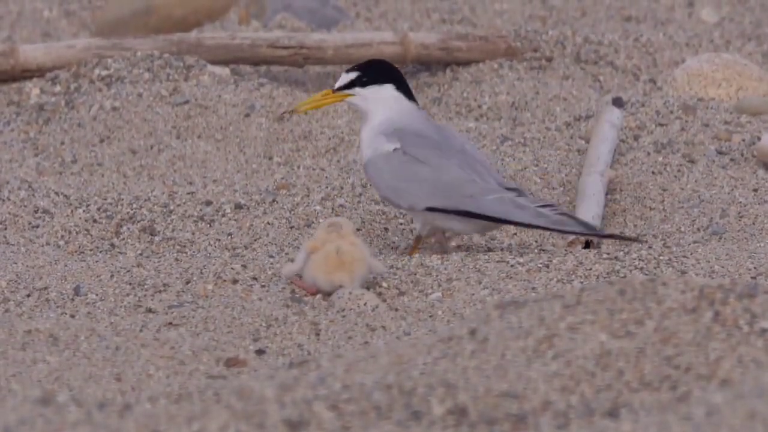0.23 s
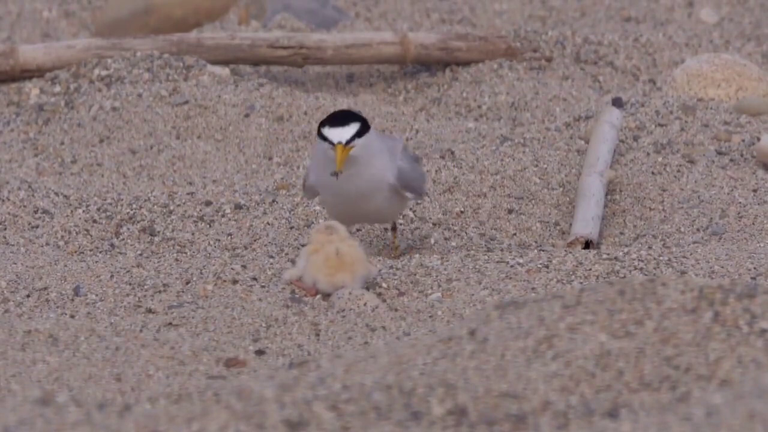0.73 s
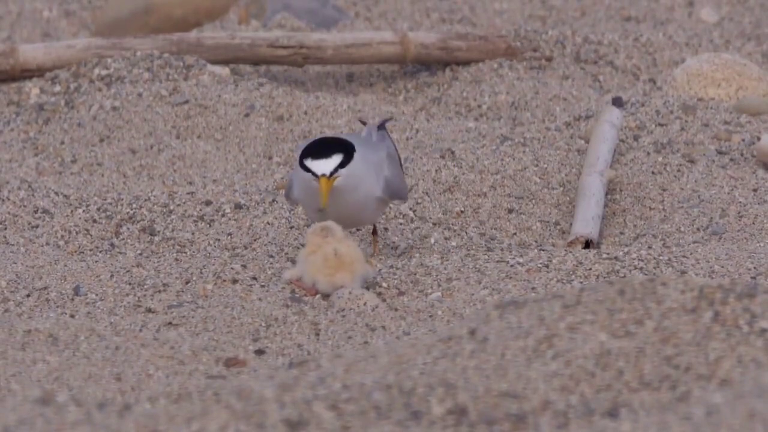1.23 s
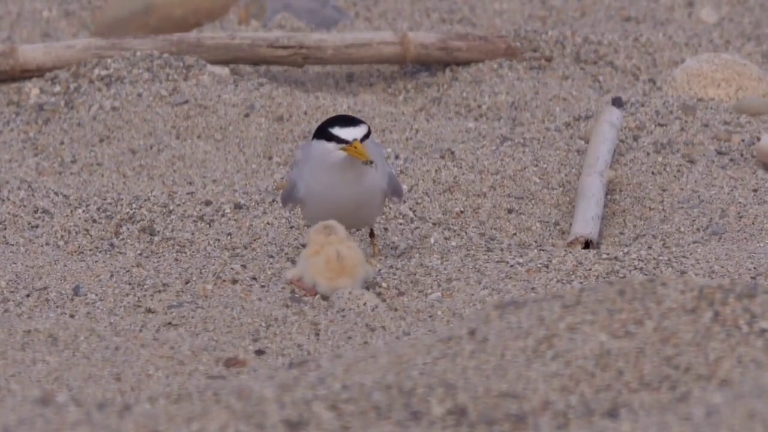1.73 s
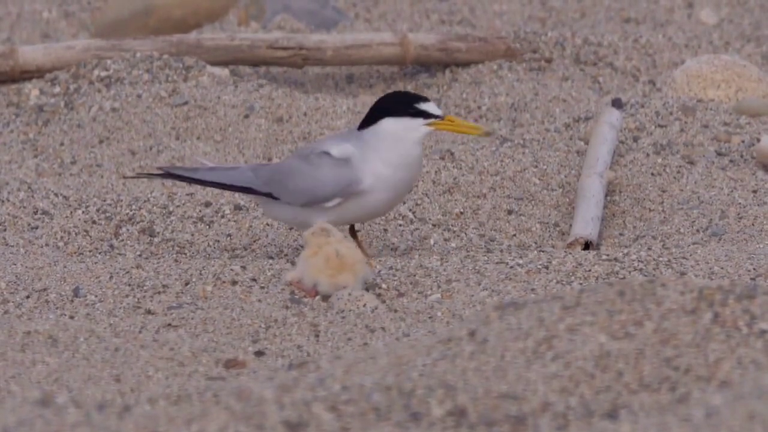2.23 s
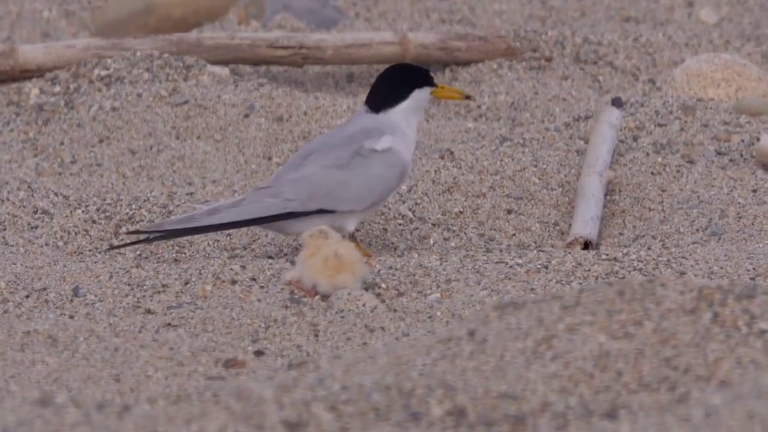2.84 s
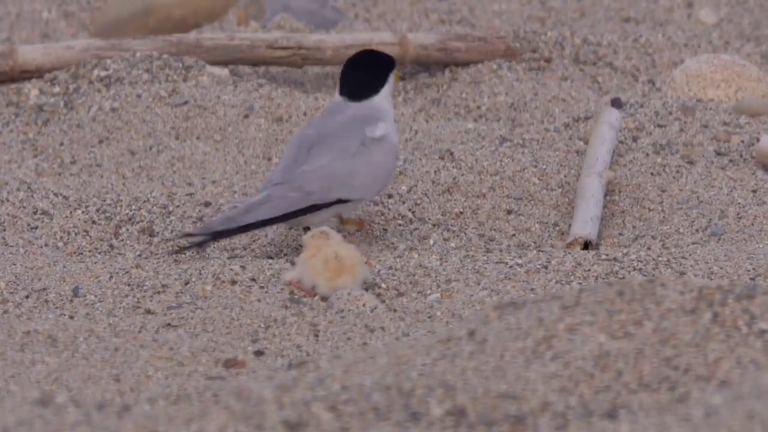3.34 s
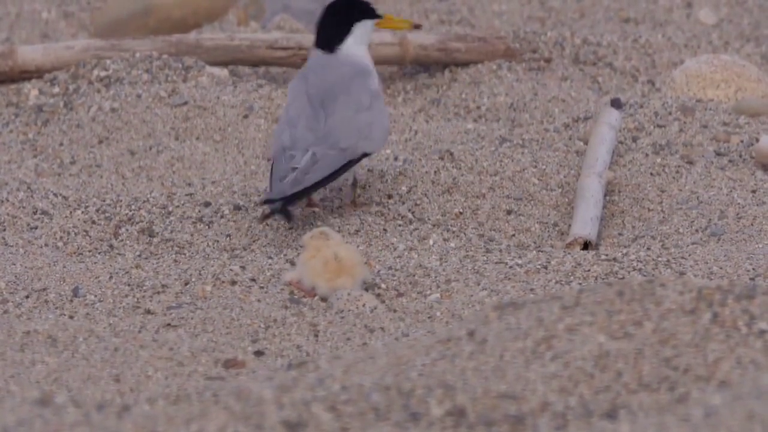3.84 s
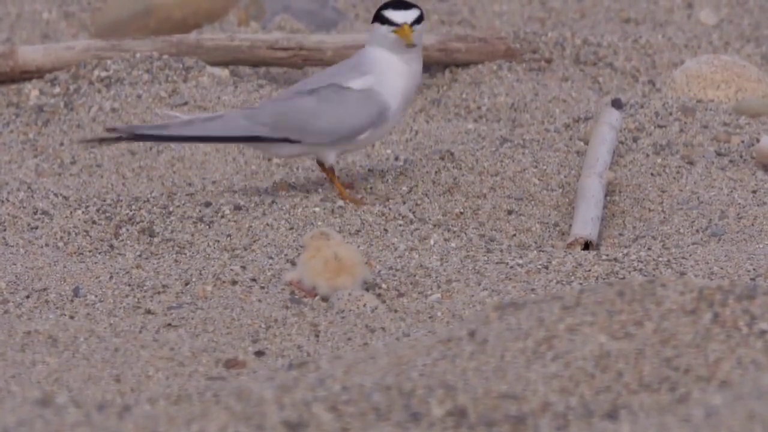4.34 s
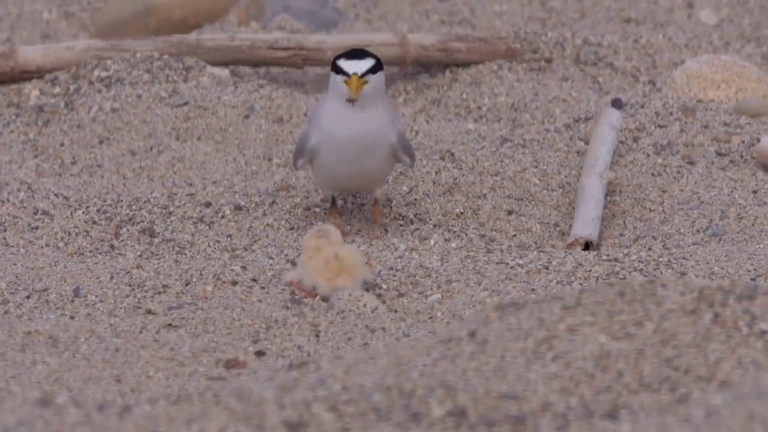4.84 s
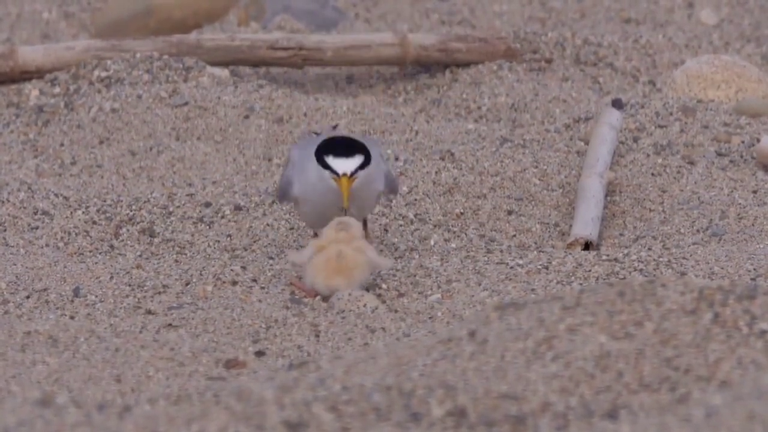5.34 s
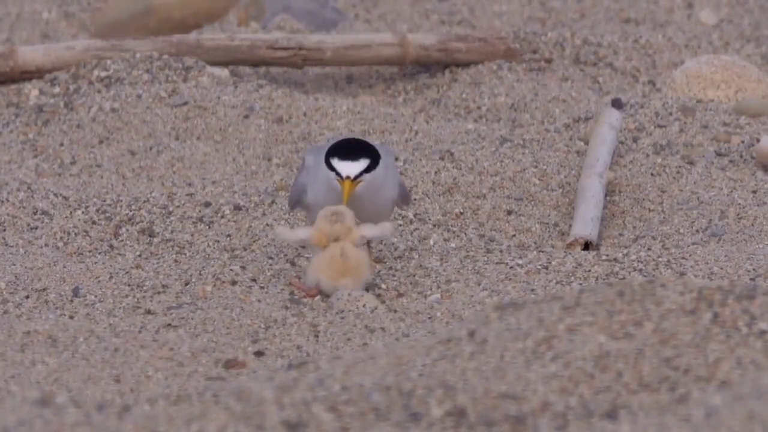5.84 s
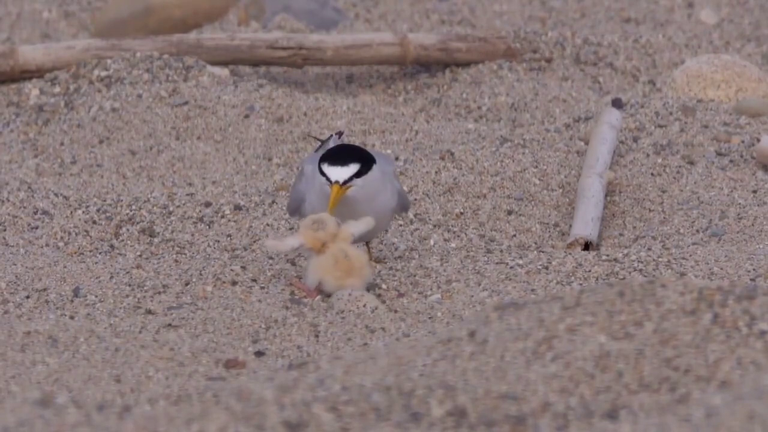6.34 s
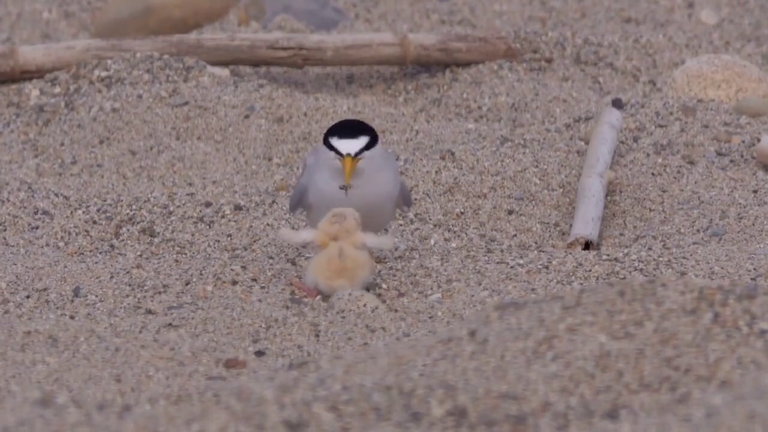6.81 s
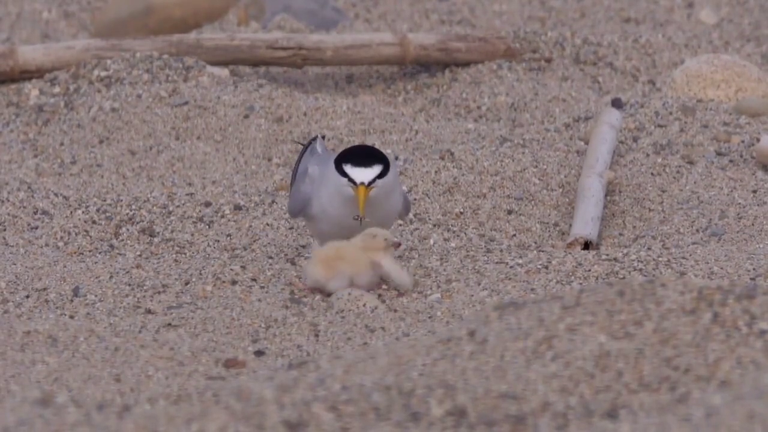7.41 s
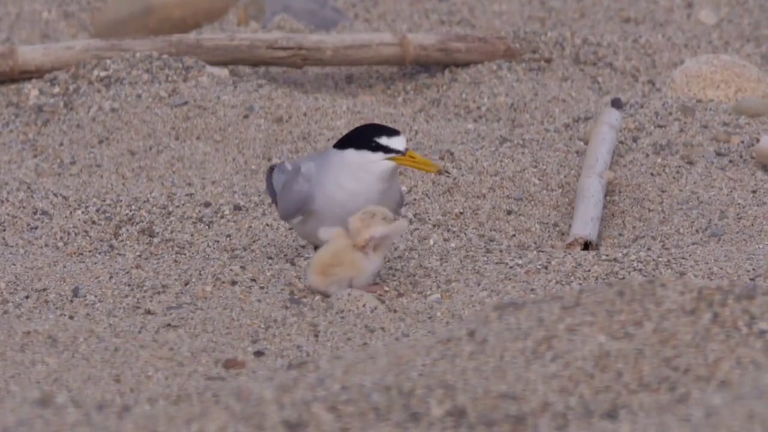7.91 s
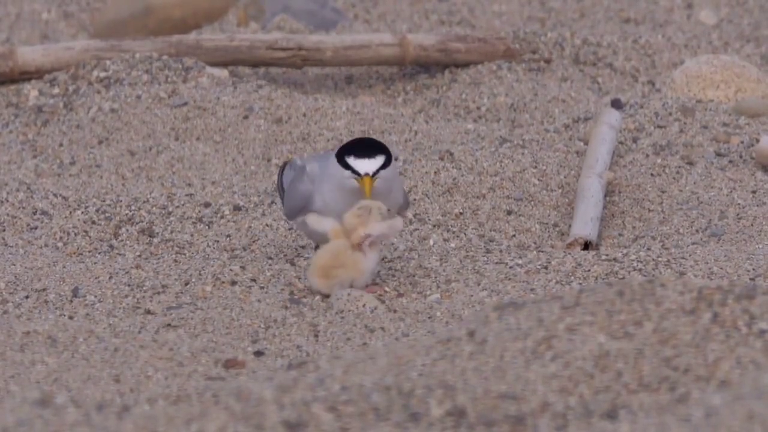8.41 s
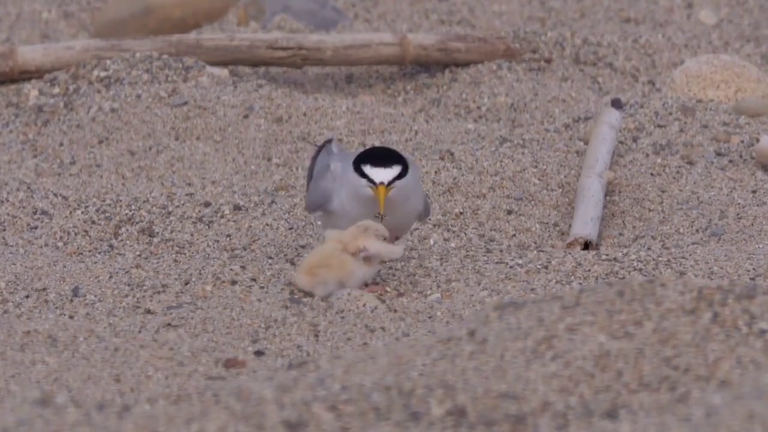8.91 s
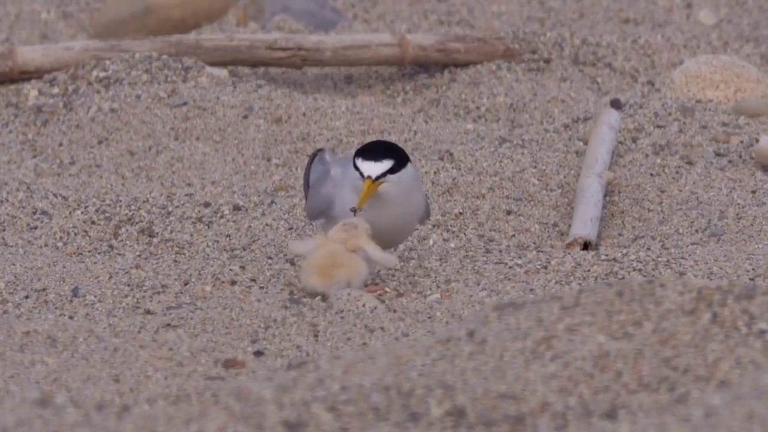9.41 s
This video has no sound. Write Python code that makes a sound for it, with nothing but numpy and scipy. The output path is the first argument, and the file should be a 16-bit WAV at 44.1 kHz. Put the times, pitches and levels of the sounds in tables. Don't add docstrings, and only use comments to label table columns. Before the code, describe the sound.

On an open beach, seabirds rasp and chirp in short bursts, ending in a near row of loud chirps over soft surf and hiss.

```python
import sys
import numpy as np
from scipy import signal
from scipy.fft import rfft, irfft
from scipy.io import wavfile
from scipy.ndimage import uniform_filter1d

SR = 44100
rng = np.random.default_rng(int(sys.argv[2]) if len(sys.argv) > 2 else 0)


def persist_wave(psi):
    counts = np.round(np.clip(psi, -1, 1) * 32767).astype(np.int16)
    wavfile.write(sys.argv[1], SR, np.atleast_2d(counts).T)


def invert_db(x):
    u = np.asarray(x, float) / 20
    return 10 ** u


N = 426006

# pitch_hz, level_db
THROAT_COLOUR = [(600, -42), (1100, -1), (1700, -9), (2600, -3), (3700, -1), (5100, -2), (6300, -4.5),
                 (7800, -6.5), (9500, -24.5), (13000, -59)]


def read(points, hz):
    f, value = np.transpose(points)
    return np.interp(np.log(hz + 1), np.log(f + 1), value)


def wander(count, smooth):
    x = uniform_filter1d(rng.standard_normal(count + 400), int(smooth))[200:-200]
    return x * np.sqrt(int(smooth))


def add(mix, start_s, sound):
    part = mix[:, round(start_s * SR):][:, :sound.shape[1]]
    part += sound[:, :part.shape[1]]


def clock(length_s):
    return np.arange(round(length_s * SR)) / SR


def fade(t, rise_s, fall_s):
    return np.clip(np.minimum(t / rise_s, (t[-1] - t) / fall_s), 0, 1)


def steady(lines_db, t):
    return invert_db(np.array(lines_db))[:, None] + 0 * t


def channels(angle_deg):
    angle = np.radians(angle_deg)
    return np.array([[np.cos(angle)], [np.sin(angle)]])


def surf():
    # pitch_hz, level_db (per Hz)
    colour = [(180, -91), (300, -2), (580, -26), (781, -12), (984, 1), (1560, -3), (1870, -4.5),
              (2440, -5.5), (3070, -7.5), (4720, -12), (5290, -11.5), (5840, -14), (9120, -15.5),
              (9910, -18.5), (15500, -17)]
    # pitch_hz, side_minus_mid_db
    width = [(60, -1), (110, 0), (200, 3), (380, -17), (700, -2.5), (1290, 2.5), (2380, 6.5), (4400, 3.5),
             (8120, -1), (15000, -1)]
    # time_s, level_db
    swell = [(0.0, -45.5), (2.7, -47), (4.57, -47), (4.85, -47), (6.27, -48), (6.75, -45), (7.5, -46),
             (8.0, -42), (8.4, -50.5), (9.66, -46.5)]
    frames, hz = N // 256 + 5, np.fft.rfftfreq(1024, 1 / SR)
    a, b, c, d, patches = rng.standard_normal((frames, 513, 5)).T
    patches = uniform_filter1d(uniform_filter1d(patches, 12, 0), 16, 1) * np.sqrt(12 * 16)
    time_s, swell_db = np.transpose(swell)
    swell_db = np.interp(np.arange(frames) * 256 / SR, time_s, swell_db - np.median(swell_db))
    share = 1 / (1 + (hz[:, None] / 5500) ** 3)
    mid_db = read(colour, hz)[:, None] + share * (swell_db + 1.7 * patches)
    side_db = (read(colour, hz) + read(width, hz))[:, None] + share * (swell_db + 0.83 * patches)
    spectra = np.array([(a + 1j * b) * invert_db(mid_db), (c + 1j * d) * invert_db(side_db)])
    mid, side = signal.istft(spectra, nperseg=1024, noverlap=768)[1][:, :N]
    return invert_db(-40) * np.array([mid + side, mid - side]) / np.std(mid)


def scatter(x):
    t = clock(.06)
    tail = rng.standard_normal((2, len(t))) * invert_db(-60 * t / 0.078) * (t > .001)
    return signal.fftconvolve(x, tail / np.linalg.norm(tail[0]), axes=1)[:, :N]


def tick(mix, start_s, level_db, angle_deg):
    t = clock(0.013)
    snap = uniform_filter1d(rng.standard_normal(len(t)) * np.exp(-t / .0005), size=4)
    ring = np.sin(2 * np.pi * 1250 * t) * np.exp(-t / .004)
    add(mix, start_s, invert_db(level_db) * (1.3 * snap + .45 * ring) * channels(angle_deg))


def sand(mix):
    # start_s, peak_db, side (1 ahead, -1 behind)
    ticks = [
        (1.165, -31, -1),
        (1.236, -28, -1),
        (2.605, -15, 1),
        (5.354, -22, 1),
        (7.346, -19, 1),
    ]
    for start_s, level_db, side in ticks:
        tick(mix, start_s, level_db, side * 33)


def voice(hz, strengths, level, level_db, bearing, rough=0.04, jitter=0.017):
    hz = hz * (1 + jitter * wander(count=len(hz), smooth=43))
    k = np.arange(1, len(strengths) + 1)[:, None]
    air_db = 0.57 * min(level_db + 12.5, 0) * np.maximum(k * hz - 5500, 0) / 1000
    gains = strengths * invert_db(read(THROAT_COLOUR, k * hz) + air_db)
    turns = k * np.cumsum(hz) / SR + rng.random(k.shape) * 0.12 + 0.403
    angle_deg, lag_us = bearing
    turns = turns + .02 * rng.standard_normal((2, len(k), 1))
    late = np.array([lag_us / 810000.0, 0])[:, None, None]
    tone = (gains * np.cos(2 * np.pi * (turns - k * hz * late))).sum(1)
    tone /= np.sqrt(np.percentile((gains ** 2).sum(0), 60) / 2)
    shared, left, right = (wander(count=len(hz), smooth=16) for _ in range(3))
    flutter = 1 + rough * (shared + 1.02 * np.array([left, right]))
    return invert_db(level_db) * level * flutter * tone * channels(angle_deg)


def peep(mix, start_s, level_db, length_s, first_hz, last_hz, bearing):
    t = clock(length_s)
    hz = first_hz + (last_hz - first_hz) * t / length_s + 60 * np.sin(np.pi * t / length_s)
    overtone_db = np.interp(hz, [3150, 3550], [-8, -24])
    strengths = invert_db(np.array([0 * t, overtone_db, overtone_db - 16]))
    level = fade(t, 0.0023, .004) * (1.1 - 0.26 * t / length_s)
    add(mix, start_s, voice(hz, strengths, level, level_db + 1, bearing, rough=.07, jitter=0.0044))


def puff(mix, start_s, level_db, width_s, bearing):
    t = clock(6 * width_s)
    air = rfft(rng.standard_normal((2, len(t))))
    colour = np.sqrt(invert_db(read(THROAT_COLOUR, np.fft.rfftfreq(len(t), 1 / SR))))
    air = irfft(air * colour, len(t))
    swell = np.exp(-.5 * (t / width_s - 3) ** 2)
    ears = abs(channels(bearing[0]))
    add(mix, start_s - 3 * width_s, invert_db(level_db) * ears * air / np.std(air) * swell)


def slide(mix, start_s, level_db, length_s, first_hz, last_hz, bearing):
    t = clock(length_s)
    low_rise = first_hz < 1500
    strengths = steady([-14, -8, 0, -2, -20] if low_rise else [-8, 0, -12, -20, -30], t)
    rough = .4 if last_hz < first_hz else .1
    hz = np.linspace(first_hz, last_hz, len(t))
    level = fade(t, 0.17 * length_s, 0.36 * length_s)
    add(mix, start_s, voice(hz, strengths, level, level_db, bearing, rough=rough))


def note(mix, start_s, level_db, length_s, hz, overtone_db, bearing):
    t = clock(length_s + 0.019)
    bend = np.interp(t, [0, 0.29 * length_s, 0.76 * length_s, length_s, length_s + 0.00342, t[-1]],
                     [.985, .997, 1.003, .97, .72, 0.266])
    after = np.clip((t - length_s) / 0.0065, 0, 1)
    held_db = np.outer([0, overtone_db, -20, -32], 1 - after)
    drop_db = np.outer([-8, -1, -14, -24], after)
    level = np.interp(t, [0, .002, length_s, length_s + 0.0056, t[-1]], [0, 1.5, 0.99, 0.78, 0.0])
    add(mix, start_s, voice(hz * bend, invert_db(held_db + drop_db), level, level_db + max(overtone_db, 0), bearing,
                            rough=.04 + .35 * after, jitter=.003 + .04 * after))


def rasp(mix, start_s, level_db, length_s, last_hz, first_db, bearing, throbs_hz=168):
    t = clock(length_s)
    u = t / length_s
    cycle = throbs_hz * t + 0.022 * wander(count=len(t), smooth=360) * u
    burst = (cycle % 1) / np.interp(u, [0, .6, .8, 1], [.38, .8, 1, 1])
    leak = np.interp(u, [0, .62, .78, 1], [.04, .07, .5, .55])
    gate = leak + (1 - leak) * np.sin(np.pi * np.minimum(burst, 1) ** .75) ** 1.3
    depth = np.interp(u, [0, .8, 1], [.06, .055, .14])
    warble = depth * np.cos(2 * np.pi * cycle - np.interp(u, [0, 1], [.6, .3]))
    sag = .004 * (level_db + 9)
    hz = last_hz * np.interp(u, [0, .45, .75, 1], [.76 + sag, .845 + sag, .95, 1.02]) * (1 + warble)
    far_db = 1.3 * (level_db + 1.5) * np.array([0.51, 0.54, 0.41, 0.7, 2.9])
    strengths = steady([1.5, 2.5, -12.5, -12.0, -26] + far_db, t)
    level = gate * invert_db(first_db * (1 - np.minimum(u / 0.28, 1))) * fade(t, 0.00024, 0.0006)
    add(mix, start_s, voice(hz, strengths, level, level_db + 5.5, bearing, rough=0.12, jitter=0.027))


def open_chirp(mix, start_s, level_db, length_s, top_hz, bearing):
    t = clock(length_s)
    arch = 1 - (2 * t / length_s - .9) ** 2
    strengths = steady([11, 3.5, -3, -2.0, 0.5, 0], t)
    level = np.clip(arch, 0, 1) ** 1.06
    add(mix, start_s, voice(top_hz * (.62 + .38 * arch), strengths, level, level_db, bearing, rough=0.11))
    puff(mix, start_s + length_s / 2, level_db - 15, .012, bearing)


def chirp(mix, start_s, level_db, top_hz, length_s, bearing):
    t = clock(0.0128)
    strengths = steady([-1.5, -3.5, -4.5, -5.0, -13, -38], t)
    level = (t / 0.0086) ** 1.15 * fade(t, .001, 0.0012)
    rise_hz = 950 + 950 * (t / .012) ** 0.77
    add(mix, start_s - .011, voice(rise_hz, strengths, level, level_db - 2.5, bearing, rough=0.26, jitter=.03))
    t = clock(length_s + 0.0106)
    start_hz = min(.97 * top_hz, 2480)
    hz = np.interp(t, [0, 0.375 * length_s, .68 * length_s, length_s, t[-1]],
                   [start_hz, top_hz, .96 * top_hz, .8 * start_hz, 0.517 * start_hz])
    hz = uniform_filter1d(hz, 130, mode="nearest")
    halves = np.clip((2800 - hz) / 200, .03, 1)
    odd = np.arange(7)[:, None] % 2
    strengths = steady([-16.5, 1.6, -0.5, 3.0, -6, -8.5, -39], t) * np.where(odd, 1, halves)
    level = (np.exp(-(t / (0.78 * length_s)) ** 5.2) + 0.17) * fade(t, 0.001, 0.0033)
    add(mix, start_s, voice(hz / 2, strengths, level, level_db + 1.14, bearing, rough=0.079))
    puff(mix, start_s + .003, level_db - 14.5, 0.015, bearing)


def sing(mix, calls, path):
    when, *place = np.transpose(path)
    for call, table in calls:
        for row in table:
            call(mix, *row, bearing=[np.interp(row[0], when, column) for column in place])


def flock(mix):
    # start_s (jump to the plateau), level_db, top_hz, length_s
    chirps = [
        (2.46, -31.5, 2445, 0.024),
        (3.309, -38.5, 2550, 0.024),
        (3.559, -40, 2505, 0.024),
    ]
    # start_s, level_db, length_s, first_hz, last_hz
    behind = [(1.148, -38, 0.029, 3840, 4500), (1.415, -37, 0.063, 4200, 3660),
              (2.535, -38, 0.017, 3600, 3580), (5.204, -32.5, 0.032, 3980, 3240),
              (6.082, -43, 0.045, 3990, 3800), (6.182, -43, 0.015, 3700, 3700),
              (6.238, -42, 0.025, 3750, 3630), (6.735, -42, 0.06, 4170, 4050),
              (6.925, -49, 0.025, 3770, 3300), (7.08, -48, 0.055, 3150, 3120),
              (7.28, -37, 0.02, 3850, 3680), (8.302, -42, 0.069, 3970, 4100),
              (8.325, -34, 0.03, 3670, 3450)]
    # start_s, level_db, length_s, first_hz, last_hz
    ahead = [(0.665, -40.5, 0.092, 4140, 3830), (1.02, -44, 0.11, 4040, 3860),
             (6.616, -28.5, 0.03, 3970, 3660), (6.618, -39, 0.04, 4750, 4420),
             (6.983, -41, 0.02, 3530, 3450), (7.326, -37, 0.063, 3800, 4070),
             (8.067, -36, 0.034, 4040, 4160), (9.194, -40, 0.032, 3850, 3850),
             (9.245, -51, 0.041, 4550, 4570), (9.352, -46, 0.023, 4360, 4450)]
    sing(mix, ((chirp, chirps), (peep, behind)), [(0, -20, 0)])
    sing(mix, ((peep, ahead),), [(0, 17, 0)])


def chick(mix):
    # start_s, level_db
    peeps = [
        (8.11, -50.8),
        (8.52, -62),
        (8.82, -56),
        (9.46, -46.7),
    ]
    length_s, first_hz, last_hz = 0.062, 5160, 5140
    shaped = [(start_s, level_db, length_s, first_hz, last_hz) for start_s, level_db in peeps]
    sing(mix, ((peep, shaped),), [(0, 45, 0)])


def parent(mix):
    # time_s, bearing_deg, lag_us (how late the left channel is)
    path = [(5.4, 58, -22), (5.47, 55.6, -15), (7.5, 43, 4), (7.64, 47.7, 15), (7.95, 60, -26),
            (8.2, 38.4, -8), (8.75, 43.5, 15), (9.1, 34.3, 0), (9.4, 39, 12)]
    chirps = [
        (7.95, 0, 2516, 0.021),
        (8.22, -1.5, 2626, 0.019),
        (8.468, -3.5, 2713, 0.023),
        (8.745, -4, 2630, 0.02),
        (9.031, -9.5, 2600, 0.029),
        (9.397, -6.5, 2465, 0.022),
    ]
    # start_s, level_db, length_s, last_hz, first_bursts_db
    rasps = [
        (5.369, -6.5, .103, 2038, -12),
        (7.504, -10.5, .106, 2070, -4),
        (9.007, -12, 0.11, 2075, -7.5),
    ]
    # start_s, level_db, length_s, pitch_hz, overtone_db
    notes_clear = [
        (5.47, -6, 0.033, 2848, -7),
        (9.112, -9.5, 0.039, 2970, -4.5),
    ]
    # start_s, level_db, length_s, first_hz, last_hz
    steps = [
        (7.608, -4, 0.0324, 2740, 2966),
        (7.636, 2.5, 0.013, 3740, 3570),
    ]
    # start_s, level_db, length_s, first_hz, last_hz
    slides = [
        (7.648, -15, 0.0151, 1994, 1314),
    ]
    sing(mix, ((chirp, chirps), (rasp, rasps), (note, notes_clear), (peep, steps), (slide, slides)), path)


def flyer(mix):
    # time_s, bearing_deg (negative is behind), lag_us (how late the left channel is)
    path = [(.07, -56, -16), (.12, -50, -29), (.25, -59.5, -6), (.267, -31, -11), (.29, -45, -12),
            (.45, -50, -14), (.65, -55, 6.5), (.9, -46, -13), (1.355, -48.5, -18), (1.38, -31, 3),
            (2, -56, -28), (2.4, -56, -9), (3.2, -65, -7), (3.8, -69.5, -20), (4.25, -70.5, 14),
            (4.7, -71.5, -16), (6.4, -75.5, -36), (7.8, -54.5, 47)]
    chirps = [(0.863, -24.5, 2260, 0.031), (1.003, -32, 2340, 0.019), (2.36, -28.5, 2270, 0.025),
              (2.666, -17.5, 2950, 0.017), (2.877, -15.5, 3030, 0.025), (3.204, -21, 2780, 0.025),
              (3.468, -24, 2320, 0.022), (3.836, -17, 2460, 0.023), (4.236, -14.5, 2520, 0.021),
              (6.381, -6.5, 2800, 0.022)]
    # start_s, level_db, length_s, top_hz
    open_chirps = [
        (7.792, 1, 0.035, 1660),
    ]
    # start_s, level_db, length_s, last_hz, first_bursts_db
    rasps = [
        (0.114, -22, 0.133, 2140, 5),
        (0.817, -24, 0.12, 2182, 1),
        (1.24, -32.5, 0.13, 2110, -4),
        (1.902, -37, 0.14, 2046, -9),
        (4.596, -23, 0.098, 1915, 3.5),
    ]
    # start_s, level_db, length_s, pitch_hz, overtone_db
    notes_clear = [
        (0.07, -25, 0.018, 2934, -5),
        (0.134, -33, 0.049, 2910, 2.5),
        (0.642, -32.5, 0.013, 2985, 10.5),
        (0.702, -35, 0.041, 3020, 7.5),
        (0.937, -25, 0.034, 2935, 4.5),
    ]
    # start_s, level_db, length_s, first_hz,
    # last_hz
    steps = [
        (0.241, -17, 0.033, 2735, 3060),
        (0.267, -10, 0.021, 3730, 3780),
        (0.362, -25, 0.047, 3910, 3500),
        (0.426, -21, 0.086, 3796, 3690),
        (1.355, -24, 0.028, 2800, 3160),
        (1.378, -17, 0.03, 3850, 3990),
        (1.998, -23.5, 0.021, 2900, 3420),
        (2.021, -28.5, 0.045, 3800, 3910),
        (4.693, -15.5, 0.025, 2620, 3130),
        (4.714, -5.5, 0.029, 3720, 3893),
    ]
    # start_s, level_db, length_s, first_hz, last_hz
    slides = [
        (0.039, -30, 0.034, 1080, 1500),
        (0.066, -22.5, 0.0082, 2120, 2370),
        (0.285, -16.5, 0.0146, 1760, 1286),
        (0.604, -24.5, .032, 1140, 1580),
        (0.633, -21, 0.0099, 2200, 2380),
        (0.699, -25, .008, 2250, 2400),
        (1.95, -41, 0.06, 1360, 1480),
        (4.742, -13.5, .009, 1975, 1770),
    ]
    sing(mix, ((chirp, chirps), (open_chirp, open_chirps), (rasp, rasps), (note, notes_clear), (peep, steps),
               (slide, slides)), path)


def scene():
    birds = np.zeros((2, N))
    for source in (sand, flock, chick, parent, flyer):
        source(birds)
    no_bass = signal.butter(N=4, Wn=950, btype="highpass", fs=SR, output="sos")
    birds = signal.sosfilt(no_bass, birds)
    return birds + invert_db(-16) * scatter(birds) + surf()


def low_pass(x):
    return signal.sosfilt(signal.butter(12, 15620, fs=SR, output="sos"), x)


def record(dry):
    limit_db, limit_share, recover_db_per_s = -12, 0.56, 36.5
    low_cut = signal.butter(N=8, Wn=680, btype="highpass", fs=SR, output="sos")
    dry = signal.sosfilt(low_cut, dry)
    power_db = 10 * np.log10(abs(uniform_filter1d((dry ** 2).max(0), 220)) + 1e-12)
    fall = np.arange(N) * recover_db_per_s / SR
    remembered_db = np.maximum.accumulate(power_db + fall) - fall
    over_db = np.maximum(remembered_db - limit_db, 0)
    ducked = dry / invert_db(limit_share * uniform_filter1d(over_db, 300))
    return low_pass(np.clip(ducked, -1, 1))


dry = scene()
out = record(dry)
persist_wave(out)
```